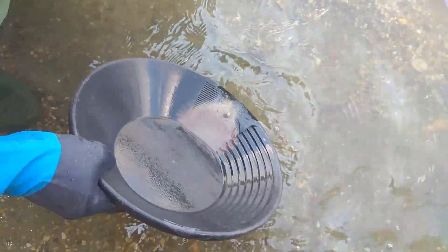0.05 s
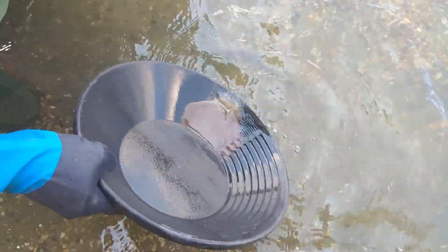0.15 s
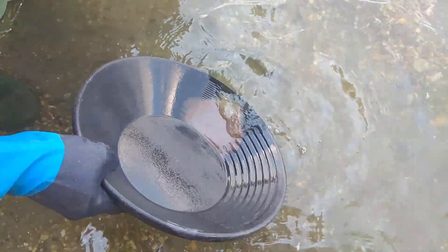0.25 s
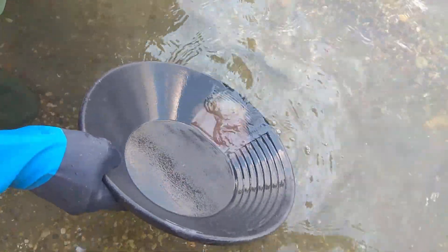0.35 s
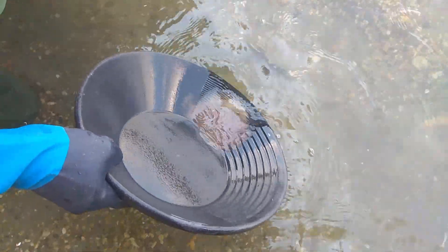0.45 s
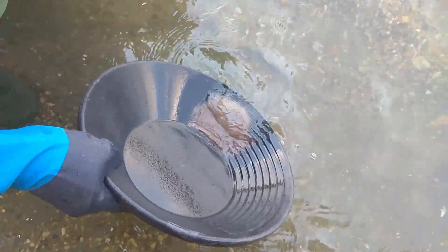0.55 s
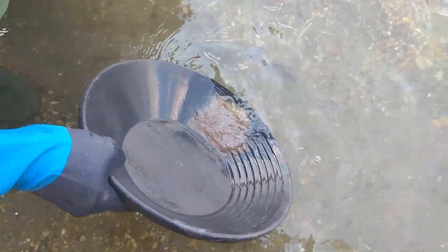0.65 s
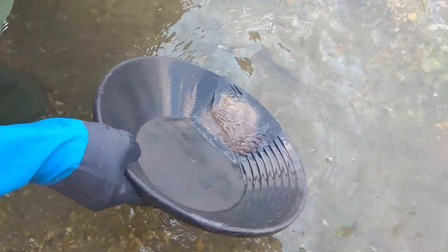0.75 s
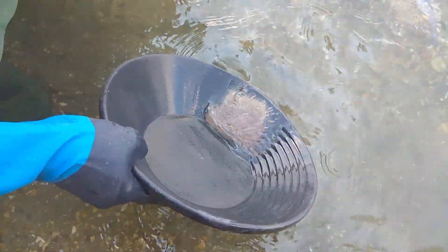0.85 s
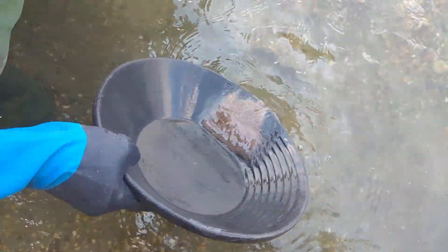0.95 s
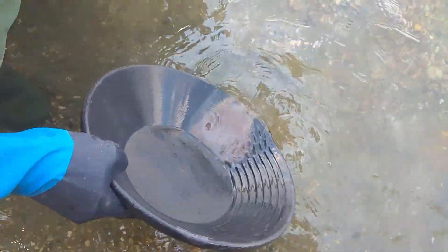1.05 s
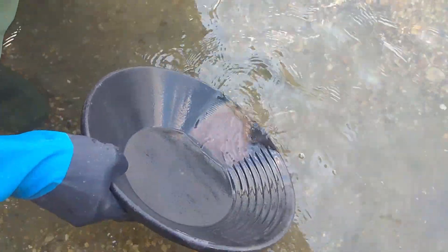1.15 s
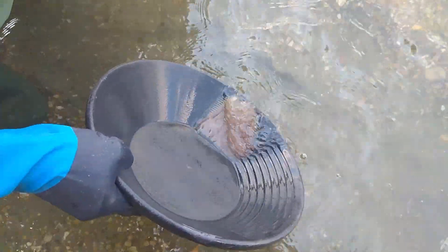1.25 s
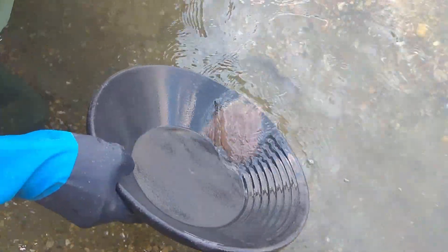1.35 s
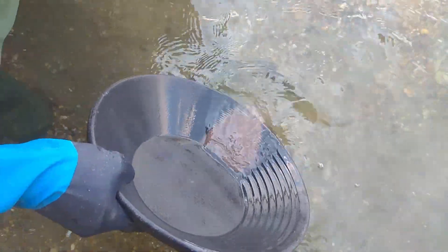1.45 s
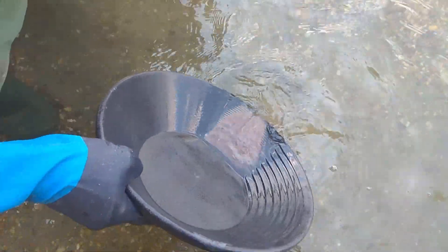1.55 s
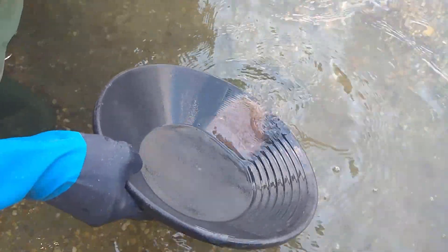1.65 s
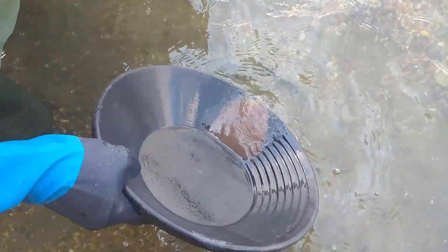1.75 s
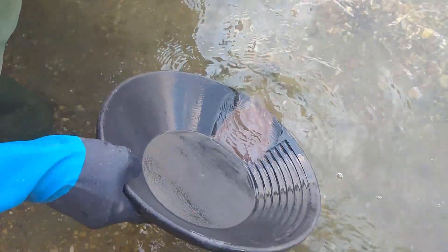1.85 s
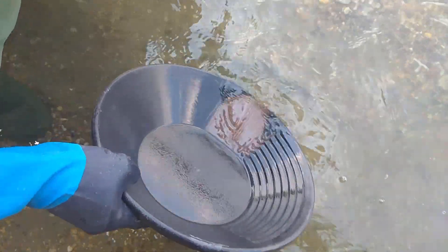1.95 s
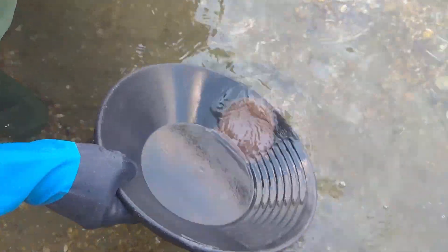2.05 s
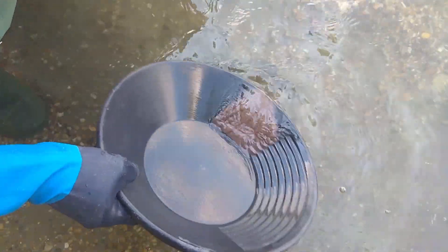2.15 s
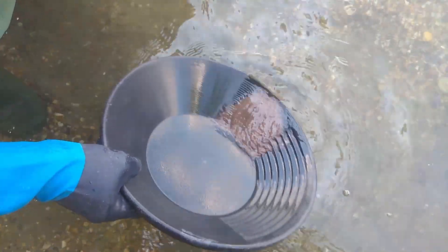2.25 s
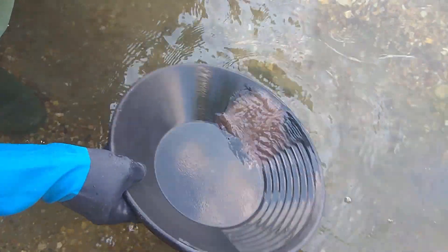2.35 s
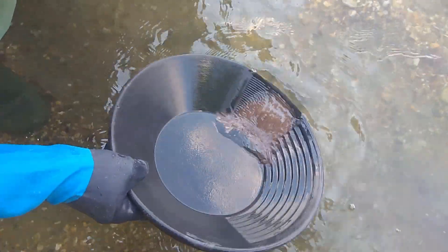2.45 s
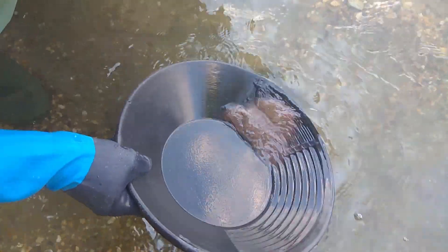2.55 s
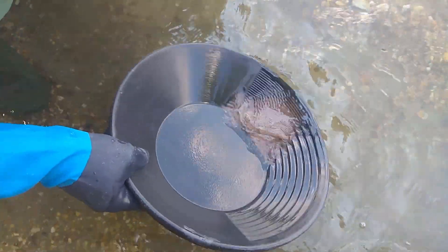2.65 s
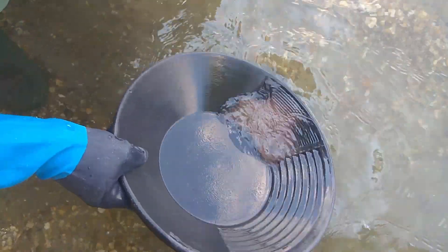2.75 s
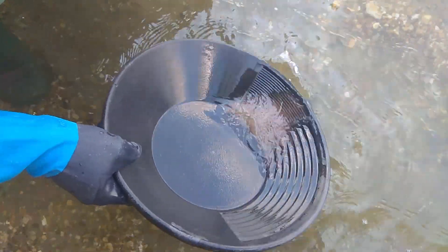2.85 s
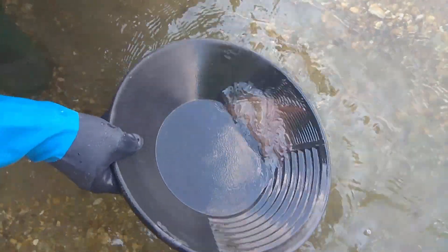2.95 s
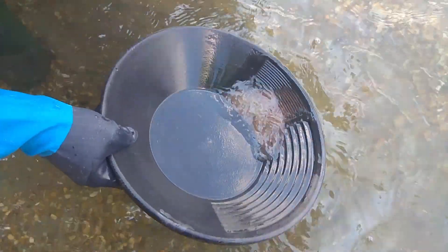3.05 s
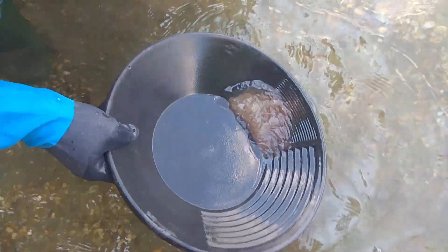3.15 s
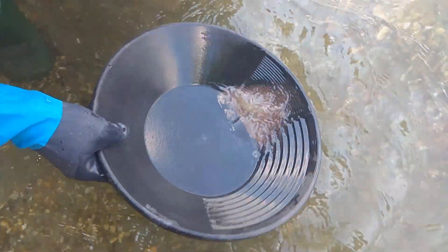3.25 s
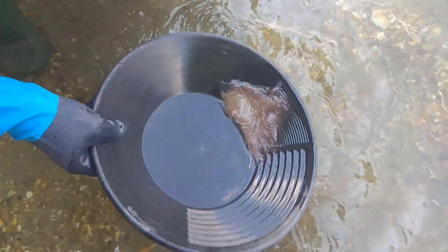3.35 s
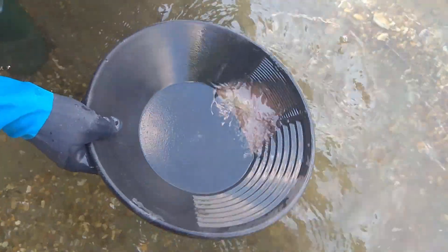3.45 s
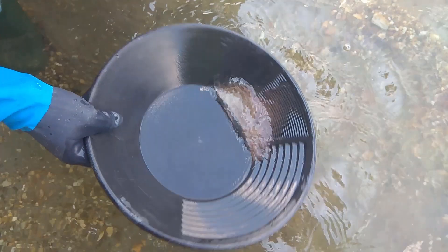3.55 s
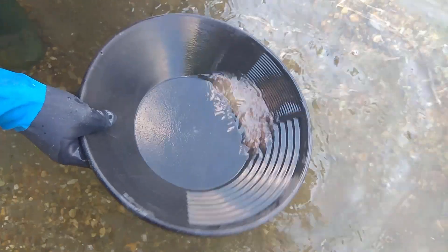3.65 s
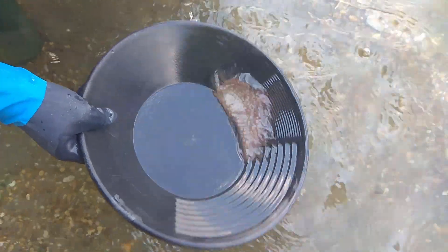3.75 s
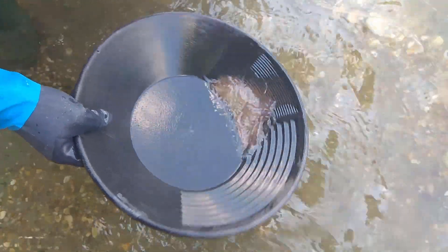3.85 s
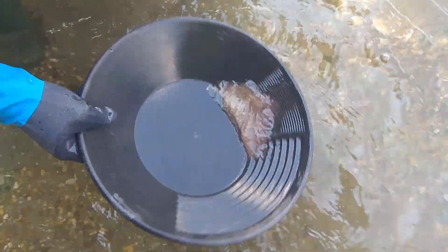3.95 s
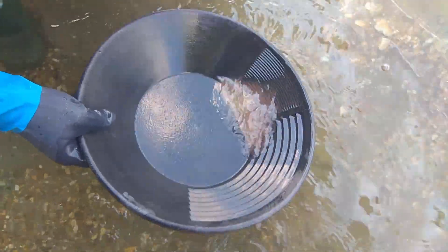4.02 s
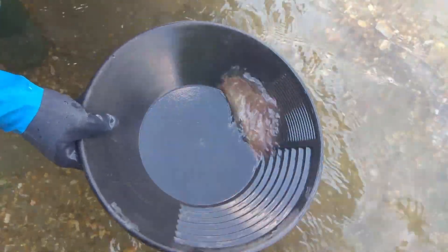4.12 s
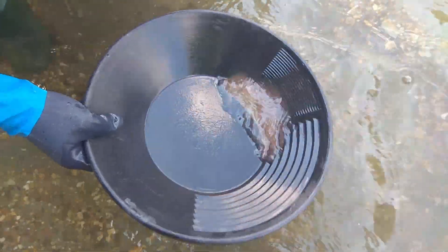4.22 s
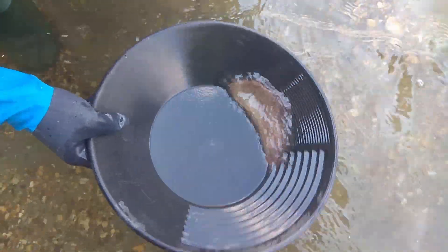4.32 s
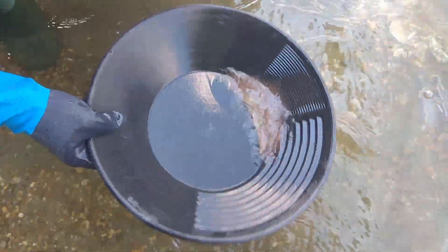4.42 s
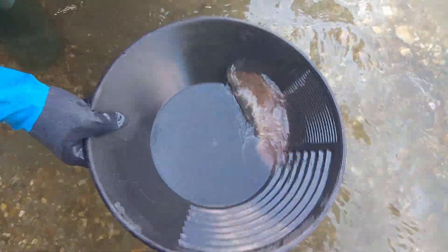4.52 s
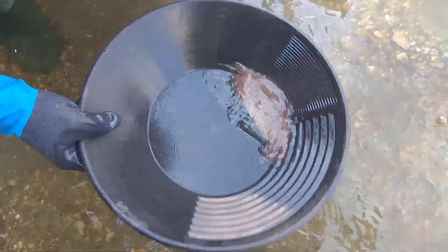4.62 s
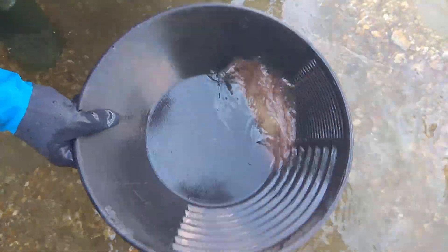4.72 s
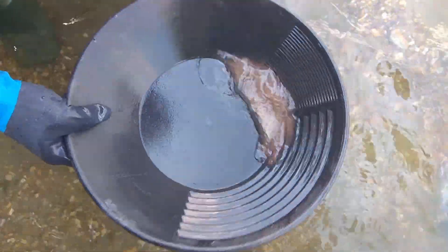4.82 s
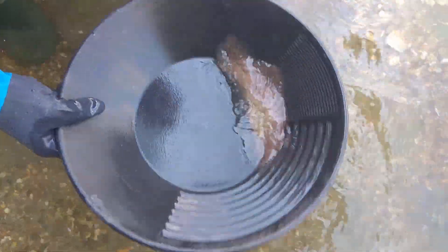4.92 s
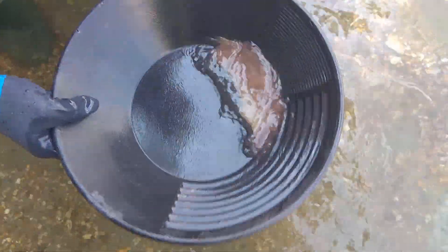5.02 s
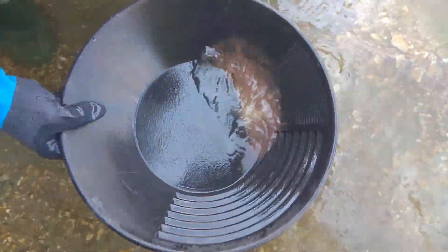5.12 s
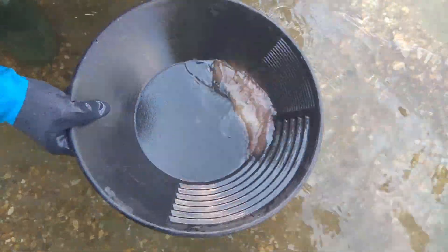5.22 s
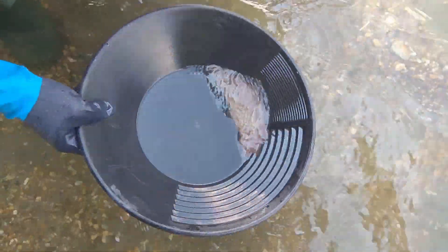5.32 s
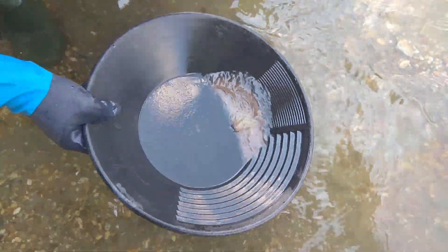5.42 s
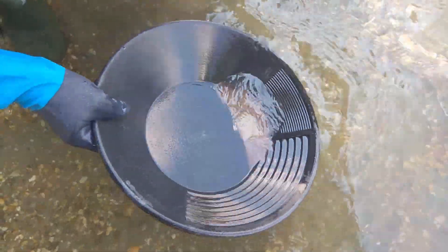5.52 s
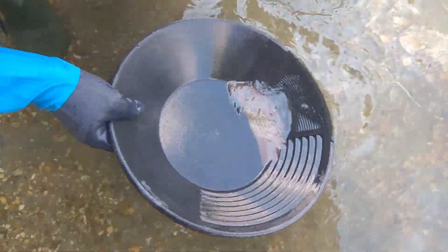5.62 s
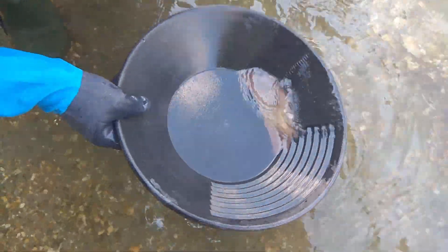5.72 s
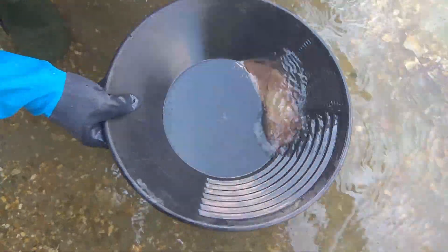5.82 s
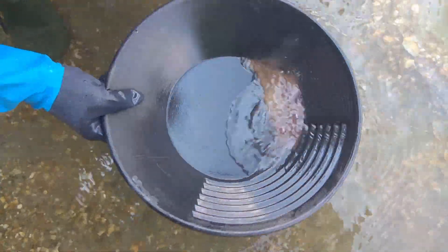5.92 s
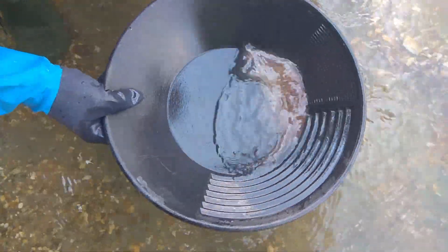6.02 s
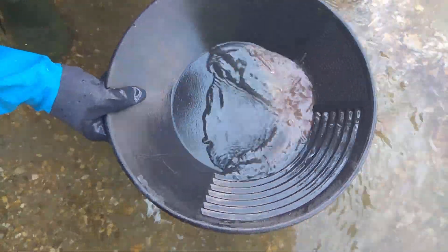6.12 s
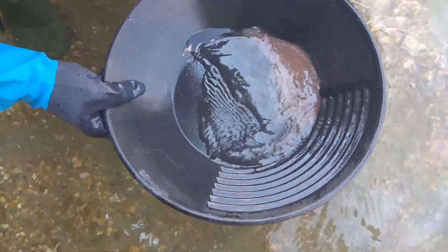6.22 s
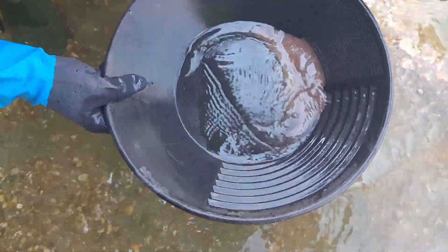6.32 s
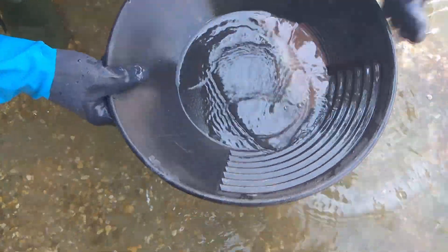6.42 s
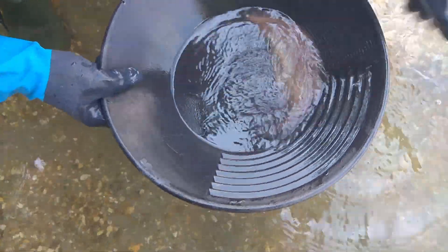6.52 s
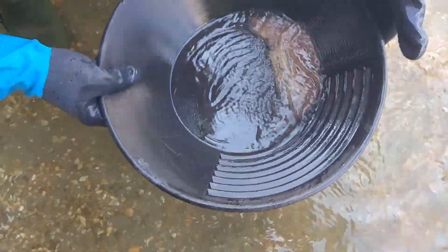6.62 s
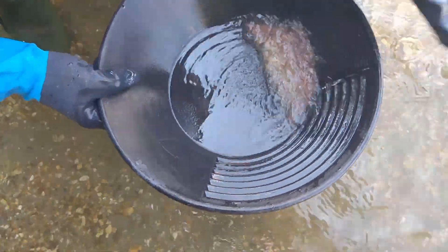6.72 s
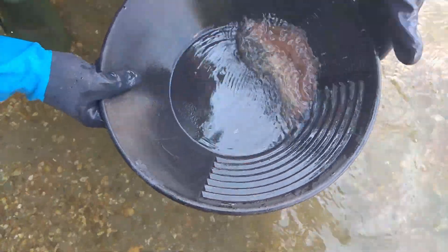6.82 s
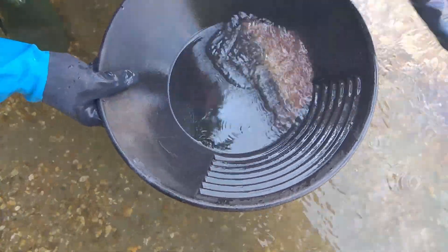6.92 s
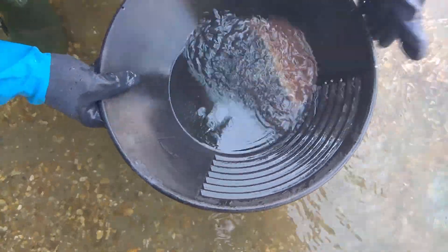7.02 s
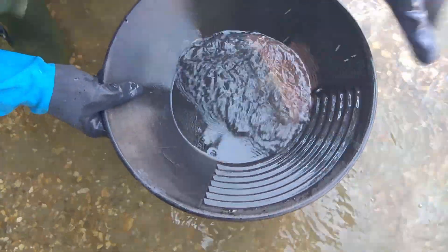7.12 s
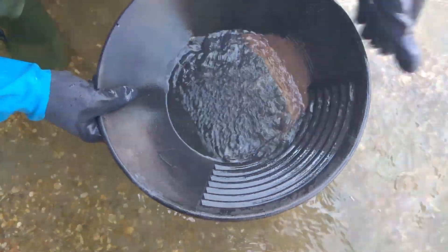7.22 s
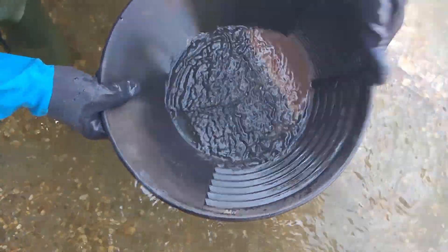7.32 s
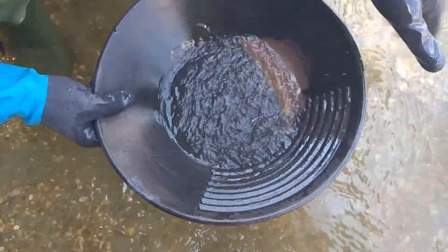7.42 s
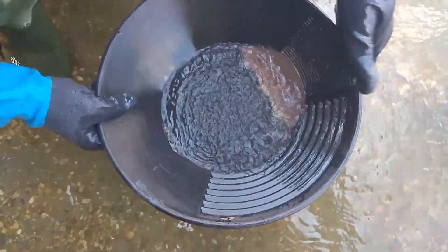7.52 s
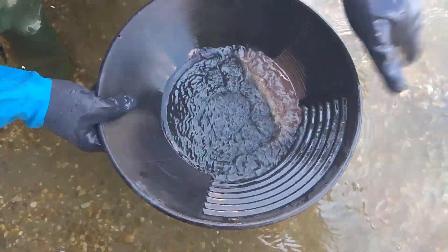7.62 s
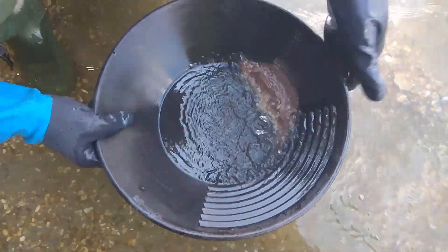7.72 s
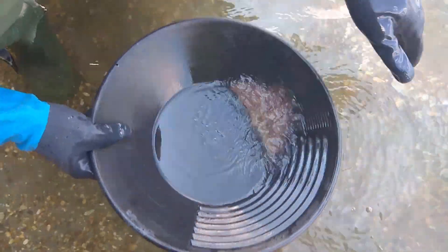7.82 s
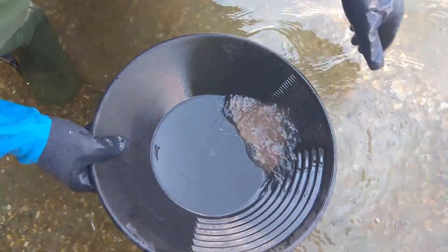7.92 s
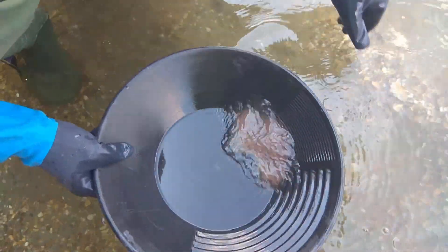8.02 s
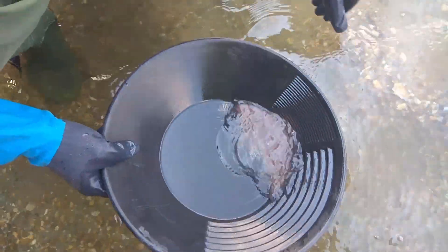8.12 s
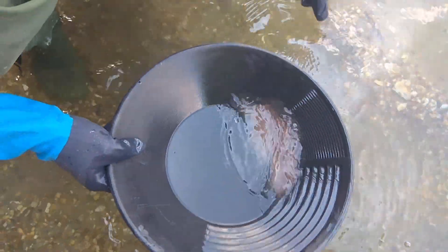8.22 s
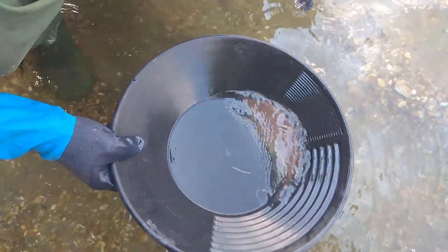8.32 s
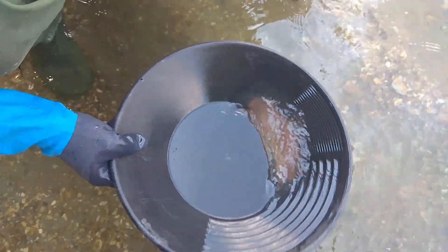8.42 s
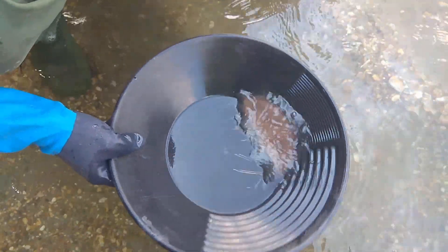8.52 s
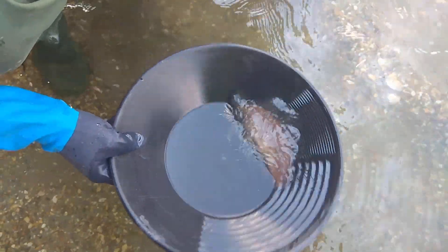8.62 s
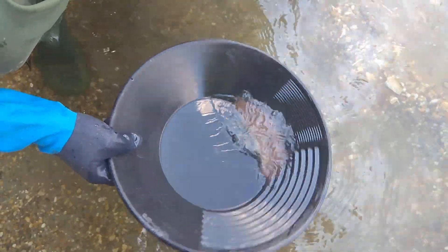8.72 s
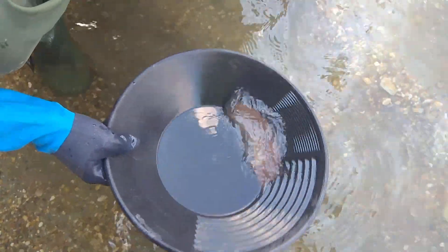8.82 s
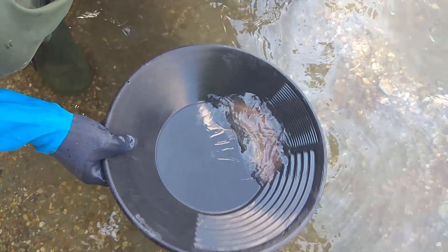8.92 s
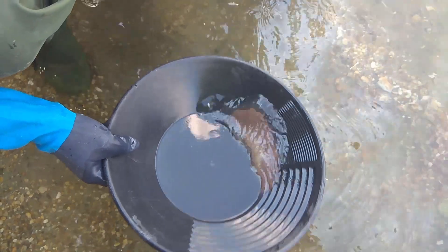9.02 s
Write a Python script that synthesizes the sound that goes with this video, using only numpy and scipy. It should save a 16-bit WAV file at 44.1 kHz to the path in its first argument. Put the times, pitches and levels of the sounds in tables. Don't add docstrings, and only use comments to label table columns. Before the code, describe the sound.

A plastic pan is swirled in a shallow stream, heard close in stereo. Quiet current and thin birds come first, then a crisp splash, swishing water, plopping bubbles and fine crackling spray. The water thins to sparse drips before another short splash. Eight evenly spaced hollow plastic taps grow firmer, with water slapping back inside. A few drips and a faint high bird note close the open-air scene, its quiet parts slightly muffled.

```python
import sys
import numpy as np
from scipy import signal
from scipy.fft import rfft, irfft, next_fast_len
from scipy.io import wavfile
from scipy.ndimage import uniform_filter1d, map_coordinates

SR = 44100
rng = np.random.default_rng(int(sys.argv[2]) if len(sys.argv) > 2 else 0)


def wav_out(sig):
    wavfile.write(sys.argv[1], SR, np.round(np.clip(np.atleast_2d(sig).T, -1, 1) * 32767).astype(np.int16))


def attenuation_scalar(level_db):
    decades = np.asarray(level_db, float) / 20
    return 10 ** decades


N = 399972
LEAD = 40

# (crest [s], level [dB], brightness [dB], rise over 20 dB [s], fall over 20 dB [s])
SURGES = [(.31, -73, 11.5, 0.15, 0.29), (1.07, -48, 5.5, 0.14, 0.54), (1.36, -37, 2.5, 0.1, 0.33),
          (1.8, -48.5, -4, 0.37, 0.63), (2.05, -47, 4, 0.266, 0.74), (2.4, -42, 1.5, 0.26, 0.45),
          (2.74, -52, -3, 0.58, 0.95), (3.0, -52, 3, 0.28, 0.18), (3.3, -65, -8.5, 0.5, 0.75),
          (3.53, -51.5, 5, 0.16, 0.14), (3.85, -49.5, 7.5, 0.089, 0.117), (4.07, -60.5, -4, 0.5, 0.37),
          (4.86, -76, 15.5, 0.073, 0.33), (5.33, -45, 6.5, 0.08, 0.1), (5.5, -46.5, 8, 0.15, 0.11),
          (5.95, -56, 1, 0.052, 0.16), (6.13, -58, 5.5, 0.21, 0.35), (6.38, -65, 5.5, .05, 0.085),
          (7.8, -50.5, 5.5, 0.21, 0.11), (8.27, -74.5, 22, 0.075, 0.114), (8.62, -64.5, 10, 0.049, .1),
          (8.78, -63.5, 6.5, 0.13, 0.11), (8.86, -49, 5.5, 0.23, 0.093), (9.07, -68, 19, 0.31, .2)]
# (delay [s], level [dB], brightness [dB], rise [s], fall [s])
TAP_SURGE = (0.05, -51, 3.5, 0.04, 0.19)
# (gurgle [dB], splash [dB], fizz [dB])
CALM_DB = (-88, -81, -76)
DIES_FASTER = 1.08
SPLASH_DB, SPLASH_LEANS = 3, 1
# (frequency [Hz], level [dB])
GURGLE = [(160, -29), (280, -7.5), (367, -12.5), (686, -7.5), (1120, -12.5), (1770, -18.5), (2000, -14.5),
          (2600, -29), (4400, -120)]
SPLASH = [(1000, -15), (1700, 0), (3500, -0.5), (5500, -3.5), (8000, -31.5)]
FIZZ = [(2650, -39.5), (4500, -6.5), (5830, -11), (7390, 1.5), (10600, 3), (12300, -11.5), (15600, -8.5),
        (16300, -22.5), (16800, -68.5)]
# (frequency [Hz], likeness [0-1])
ALIKE = [(100, 0.72), (500, 0.88), (1500, 0.0072), (15000, 0.088)]

# (time [s], bubble [Hz], plop [dB], crackle
# [dB])
DROPS = [(.276, 3830, -42.5, -27), (.663, 2540, -39.5, -36.5), (1.106, 3800, -51, -22),
         (1.132, 1990, -33.5, -29), (1.188, 3502, -30.5, -49.5), (1.218, 5700, -39, -22),
         (1.245, 3580, -31.5, -27.5), (1.269, 2900, -33.5, -31.5), (1.324, 2315, -17.5, -9),
         (1.726, 2270, -31, -57), (1.817, 1199, -32, -31), (2.011, 3160, -30.5, -26),
         (2.12, 2060, -39, -32), (2.193, 1080, -55, -35), (2.387, 656, -43, -17.5),
         (2.459, 690, -43.5, -48.5), (2.529, 2410, -26.5, -28.5), (2.689, 3740, -34.5, -54),
         (2.724, 2060, -27, -31), (2.873, 2160, -33.5, -39), (2.956, 3740, -35.5, -61),
         (3.06, 740, -71, -32.5), (3.162, 720, -57, -34),
         (3.425, 2360, -46, -31.5), (3.452, 3780, -26.5, -24), (3.485, 6000, -37, -26),
            (3.56, 2020, -42.5, -27), (3.724, 740, -48.5, -31), (3.748, 2010, -36.5, -59),
            (3.797, 2070, -42.5, -28.5), (3.829, 722, -44.5, -26), (3.943, 5200, -36.5, -41),
            (3.98, 1600, -62, -26.5), (4.006, 637, -37.5, -75), (4.099, 1626, -28, -66),
            (4.197, 610, -57, -43), (4.238, 4520, -38.5, -61), (4.391, 961, -59, -40),
            (4.828, 5180, -60, -28.5), (5.281, 1670, -45.5, -41), (5.304, 833, -50, -30),
            (5.442, 3960, -52, -36), (5.462, 2020, -25, -16), (5.821, 1910, -56, -65),
            (5.931, 755, -42.5, -29.5), (5.968, 1350, -40, -27), (6.037, 5870, -50, -16.5),
            (6.116, 4170, -38.5, -51), (6.355, 2410, -37, -34),
         (3.406, 6500, -37.5, -35), (4.414, 3350, -51.5, -62.5), (4.762, 4330, -50, -57),
         (5.211, 3510, -58, -60), (7.948, 6100, -51.5, -65), (6.77, 2390, -36, -55),
         (6.987, 5470, -41, -51), (7.231, 4200, -32.5, -35), (7.406, 5020, -26.5, -28),
         (8.403, 4205, -44, -71), (8.476, 1330, -50.5, -75), (8.508, 1440, -50.5, -42.5),
         (8.561, 1890, -38, -27), (8.581, 3070, -38.5, -33), (8.593, 4240, -36.5, -22.5),
         (8.728, 3500, -42, -56), (8.755, 4060, -40, -33), (8.823, 844, -48, -26),
         (8.854, 3230, -37.5, -24.5), (8.984, 4400, -44, -33)]
# (time [s], left over right [dB])
RIM_PLACE = [(0, 3), (1.2, 7), (1.8, 6), (2.1, 11.5), (2.5, 3.5), (2.9, 4.5), (3.5, 2.5), (4.2, -3),
             (4.9, -5.5), (5.3, 7.5), (6.3, -6.5), (7, 3), (9.07, 4.5)]
SMALL_HZ, SMALL_SLAP_DB, SMALL_LEFT_DB = 3500, -8.5, 6

# (time [s], peak [dB], crack [dB], upper modes [dB], slosh [dB])
TAPS = [
    (6.511, -24.5, -1, 2.5, -0.5),
    (6.689, -20.5, -1, 3.5, -1),
    (6.848, -12, -7, -2.5, -9),
    (7.024, -15, -6, 4, -7.5),
    (7.194, -15, -3, 7.5, -8),
    (7.368, -11, -11.5, -1.5, -7.5),
    (7.538, -10, -8.5, 2.5, -6),
    (7.701, -8.5, -10.5, -2.5, -5),
]
# (frequency [Hz], level [dB], t60 [s])
PAN_MODES = [(226, -4.5, 0.11), (284.5, 0.5, 0.06), (550, -8, 0.054), (899, -15.5, 0.055),
             (1270, -4, 0.015), (1730, -13, 0.02), (2020, -7.5, 0.022)]
# (frequency [Hz], level [dB])
SLOSH_MODES = [(673, -3), (818, -13.5)]
# (frequency [Hz], level [dB])
CRACK = [(410, -31), (700, -11), (1680, -8), (1920, -6.5), (2260, -3.5), (2870, -12.5), (6030, -12),
         (9110, -6.5), (14300, -17.5), (16800, -33.5)]
SPRAY_DB = (-40.5, -41.5, -38.5, -31.5, -40, -35.5, -38, -37)
SLAP_BACK_S = (.024, 0.011, .027, 0.024, 0.017, 0.028, .028, 0.024)
CHURN = (.8, .9, .6, .9, .5, .2, .15, .2)
HOLD_S, RINGS_ON = 0.011, 0.28

# (time [s], peak [dB])
SNAPS = [(1.107, -29.5), (1.325, -9), (1.33, -16), (1.726, -35), (2.012, -20.5), (2.195, -28), (2.389, -19),
         (2.532, -17), (2.725, -22), (2.875, -32.5), (3.452, -28.5), (3.982, -30), (4.097, -43),
         (5.465, -17), (5.46, -14)]
# (time [s], centre
# [Hz], peak [dB])
TICKS = [(1.153, 1990, -32), (1.23, 5540, -26), (1.258, 9500, -25), (1.292, 3440, -38), (1.34, 3100, -28),
         (1.385, 8400, -25), (1.397, 9500, -33), (1.411, 8900, -22), (1.417, 8500, -27), (1.436, 3700, -34),
         (1.472, 5000, -35), (1.551, 6000, -36), (1.757, 6000, -44), (1.807, 8260, -28), (1.874, 1220, -46),
         (1.963, 8900, -33.5), (1.975, 1140, -38), (2.024, 8600, -21), (2.03, 3380, -27.5),
         (2.043, 1030, -38.5), (2.079, 8750, -32.5), (2.086, 8000, -41), (2.13, 10400, -29),
         (2.166, 6020, -29.5), (2.203, 1090, -33.5), (2.241, 1090, -41), (2.253, 10500, -29),
         (2.265, 7700, -32), (2.341, 2370, -34), (2.357, 2010, -32), (2.364, 9400, -24), (2.374, 7000, -19),
         (2.414, 8500, -24), (2.437, 9000, -25), (2.553, 8800, -26), (2.641, 6230, -43), (2.907, 1700, -35),
         (3.02, 7460, -32), (3.222, 5000, -46.5), (3.255, 7800, -34.5), (3.363, 6150, -49),
         (3.512, 7040, -31),
         (3.73, 8700, -27), (3.775, 9500, -35), (3.836, 6200, -25), (3.907, 1330, -40),
              (3.918, 2020, -41), (3.957, 7400, -37), (4.05, 9000, -34.5), (4.173, 7600, -38),
              (4.43, 805, -66), (4.64, 740, -63.5), (4.66, 2140, -59), (4.825, 1420, -57.5),
              (4.879, 1410, -58), (4.949, 820, -52), (4.95, 4040, -60), (5.024, 1220, -57),
              (5.149, 1380, -66), (5.168, 8900, -46), (5.252, 8950, -38), (5.329, 1940, -33),
              (5.344, 1060, -48), (5.402, 4680, -38), (5.499, 4560, -29), (5.555, 6050, -36),
              (5.651, 8650, -41.5), (5.914, 8390, -34.5), (6.035, 2750, -35.5), (6.05, 2300, -36),
              (6.073, 8150, -35), (6.147, 2020, -43.5), (6.17, 8950, -31), (6.194, 9000, -36),
              (6.223, 4630, -44.5), (6.248, 2540, -46), (6.278, 7300, -49), (6.824, 5870, -40),
              (7.073, 8250, -26), (7.251, 655, -37), (7.335, 4700, -45), (7.57, 6780, -27),
              (8.115, 2110, -57.5), (8.367, 826, -52), (8.389, 3670, -46), (8.436, 4500, -49),
              (8.465, 6000, -57.5), (8.717, 5980, -43), (8.773, 2580, -40), (9.041, 5700, -37),
         (.092, 1400, -53), (0.32, 8000, -46), (2.5, 6200, -27), (2.39, 1500, -49), (3.1, 5500, -36),
               (5.278, 11500, -33), (5.476, 9500, -27), (5.688, 6500, -52), (4.1, 3000, -40)]
TICK_CYCLES, TICK_S = 5.2, 0.0016
TICK_WIDENS = 0.28
# (time [s], frequency [Hz], level [dB], life [s])
THUMP = (2.385, 260, -32, .0035)
# (start [s], length [s], first [Hz], last [Hz], width [Hz], level [dB])
RUNNEL = (3, .3, 3247.5, 2451, 380, -43.5)

# (frequency [Hz], level [dB])
RUMBLE = [(15, -56.5), (25, -18), (65, -22.5), (106, -2.5), (156, 4), (209, 3.5), (302, -17.5),
          (391, -36.5), (420, -36.5), (550, -51.5), (920, -120)]
# (time [s], level [dB])
CURRENT_LEVEL = [(0, -49.5), (1.35, -48), (2, -52), (2.4, -64.5), (2.85, -48), (3.4, -54), (4.4, -48),
                 (4.9, -48.5), (5.5, -43), (6.35, -55), (6.62, -45), (7.15, -46), (7.66, -52), (7.8, -49),
                 (8.0, -72), (8.25, -62.5), (8.93, -81.5), (9.07, -54.5)]
# (frequency [Hz], level [dB])
RIFFLE = [(1000, -85), (1700, -35.5), (2060, -35), (2260, -10.5), (3670, 0), (5010, -11.5), (5460, -34.5),
          (5850, -14.5), (6500, -50), (13200, -120)]
# (time [s], level [dB])
RIFFLE_LEVEL = [(0, -49), (1.0, -52.5), (1.3, -48), (2.9, -63), (3.15, -102), (9.1, -68)]
# (time [s], level [dB])
TRICKLE_LEVEL = [(4.2, -85.5), (4.45, -63), (4.82, -85), (4.97, -73), (5.6, -76.5), (5.85, -90.5),
                 (6.15, -55.5), (6.35, -82.5), (7.85, -86), (7.92, -72.5), (8.2, -100.5)]
# (start [s], length [s], frequency [Hz], level [dB])
FAR_CALLS = [(4.295, 0.32, 1560, -75), (4.644, 0.06, 3900, -76), (4.68, .05, 2044, -71),
             (4.843, 0.069, 2660, -80), (5.032, 0.14, 2325, -68), (5.149, 0.25, 1390, -64),
             (5.824, 0.07, 1940, -76), (7.866, 0.24, 1360, -66.5), (7.95, 0.27, 3790, -76.5),
             (8.172, 0.16, 3530, -67), (5.929, 0.059, 1690, -47.5), (5.94, 0.049, 794, -49.5),
             (5.97, 0.044, 1330, -45), (8.353, 0.15, 3305, -68), (8.356, 0.071, 1295, -67),
             (8.411, 0.073, 1490, -62)]
# (start [s], length [s], first [Hz], last [Hz], level [dB])
BIRDS = [
    (0, .27, 2220, 2180, -55),
    (.05, .08, 3900, 3250, -51),
    (.28, .07, 3950, 3100, -49),
    (3.15, .27, 3720, 4000, -68),
    (4.41, .17, 1950, 2300, -67),
    (4.98, .15, 2700, 2250, -74),
    (6.62, .07, 7900, 7800, -57),
    (6.76, .08, 7600, 7500, -57),
    (8.03, .34, 7880, 7480, -56),
]
# (frequency [Hz], t60 [s])
BANK_ECHO = [(300, 0.072), (3000, 0.077), (12000, 0.043)]


def unit(x):
    return x / np.sqrt(np.mean(x ** 2) + 1e-20)


def along(points, hz):
    f, v = np.transpose(points)
    return np.interp(np.log(hz + 1), np.log(f + 1), v)


def curves(rows):
    s, *columns = np.transpose(rows)
    return [np.interp(np.arange(N) / SR, s, column) for column in columns]


def wobble(rate):
    knots = rng.standard_normal(int(N * rate / SR) + 4)
    return map_coordinates(knots, [np.arange(N) * rate / SR])


def filtered(x, response):
    m = next_fast_len(x.shape[-1] + 512)
    spectrum = rfft(x, m) * response(np.fft.rfftfreq(m, 1 / SR))
    return irfft(spectrum, m)[..., :x.shape[-1]]


def blank():
    return np.zeros((2, N + SR))


def trim(mix):
    return mix[:, LEAD:N + LEAD]


def add(mix, s, sound, left_db, lag):
    pair = sound * attenuation_scalar([[left_db / 2], [-left_db / 2]])
    at = round(s * SR) + LEAD
    mix[0, at + round(lag):][:pair.shape[1]] += pair[0]
    mix[1, at:][:pair.shape[1]] += pair[1]


def rim_db(s):
    return np.interp(s, *np.transpose(RIM_PLACE))


def rush(spectrum, alike, patchy_db):
    z = signal.stft(rng.standard_normal((2, N)), nperseg=512)[2]
    field = uniform_filter1d(rng.standard_normal(z.shape[1:]), 6, 0)
    field = unit(uniform_filter1d(field, 8, 1))
    pair = signal.istft(z * attenuation_scalar(patchy_db * field), nperseg=512)[1][:, :N]

    def mid_side(hz):
        turn = np.arccos(np.clip(along(alike, hz), -1, 1)) / 2
        return attenuation_scalar(along(spectrum, hz)) * [np.cos(turn), np.sin(turn)]

    mid, side = filtered(pair, mid_side)
    return unit(np.array([mid + side, mid - side]))


def bubbles(count, hz, spread, cycles, scatter_db, size):
    u, g = rng.random((count, 4)), rng.standard_normal((count, 1))
    t = np.arange(size) / SR
    f = np.clip(hz * np.exp(spread * g), 200, SR / 3)
    age = t * f / cycles
    strength = attenuation_scalar(-scatter_db * np.log(u[:, 1:2] + 1 / 30))
    wave = np.sin(2 * np.pi * f * t * (1 + .12 * age)) * age * np.exp(-3 * age) * strength
    at = (u[:, :1] * N).astype(int) + np.arange(size)
    lag = (u[:, 2:3] * 30).astype(int)
    ports = []
    for delay, weight in ((lag, 1), (15, 0.35 + 1.3 * u[:, 3:])):
        ports.append(np.bincount((at + delay).ravel(), (wave * weight).ravel(), N + SR)[:N])
    return unit(np.array(ports))


def surges():
    delay, *shape = TAP_SURGE
    t = np.arange(0, N, 64) / SR
    shaken = [(tap[0] + delay, *shape) for tap in TAPS]
    s, db, bright, rise, fall = np.transpose([*SURGES, *shaken])[..., None]
    fade_db = -20 * np.maximum((s - t) / np.abs(rise), (t - s) / np.abs(fall)) ** DIES_FASTER
    splash_db = db + SPLASH_DB + SPLASH_LEANS * bright - np.abs(bright)
    levels = []
    for crest, calm in zip((db - bright, splash_db, db + bright), CALM_DB):
        gain = np.sqrt(attenuation_scalar(calm) ** 2 + np.sum(attenuation_scalar(crest + fade_db) ** 2, axis=0))
        levels.append(np.interp(np.arange(N) / SR, t, gain))
    return levels


def wash():
    low, middle, high = surges()
    patter = wobble(60)
    stirred = [np.sqrt(np.abs(1 - (attenuation_scalar(calm) / g) ** 2)) for calm, g in zip(CALM_DB, (low, middle, high))]
    plops = .45 * bubbles(count=1400, hz=1000, spread=.4, cycles=8, scatter_db=3, size=600)
    pings = .75 * bubbles(count=1300, hz=2900, spread=.4, cycles=4.5, scatter_db=3.5, size=240)
    specks = .75 * bubbles(count=2200, hz=8500, spread=.25, cycles=2.2, scatter_db=3.5, size=60)
    gurgle = low * attenuation_scalar(patter) * (rush(GURGLE, ALIKE, patchy_db=4) + stirred[0] * plops)
    splash_gain = middle * attenuation_scalar(-5.0 + 2.0 * patter + [[1.6], [-1.6]])
    splash = splash_gain * (rush(SPLASH, ALIKE, patchy_db=5.0) + stirred[1] * pings)
    fizz_gain = high * attenuation_scalar(-6.5 + 2 * patter + [[1.8], [-1.8]])
    fizz = fizz_gain * (rush(FIZZ, ALIKE, patchy_db=4.5) + stirred[2] * specks)
    return gurgle + splash + fizz


def bubble_ring(t, hz, plop_db, pitch_draw):
    ring = np.clip(7.5 / hz, .002, .011)
    phase = 2 * np.pi * hz * t * (.95 + .06 * t / ring)
    brood = np.sin(1.85 * phase) + np.sin((2.4 + 1.1 * pitch_draw) * phase)
    brood = 0.97 * (hz < 1200) * brood * np.exp(-t / ring)
    envelope = (1 - np.exp(-t / 0.00043)) * np.exp(-(t / ring) ** 2.5)
    return attenuation_scalar(plop_db + 5.5) * (np.sin(phase) + brood) * envelope


def drops():
    mix, t = blank(), np.arange(SR // 16) / SR
    for s, hz, plop_db, crackle_db in DROPS:
        small, db = hz > SMALL_HZ, max(plop_db, crackle_db) + 8
        u, noise = rng.random(3), rng.standard_normal((3, 2, len(t)))
        life = np.clip(0.0088 + 0.00019 * (db + 42), .002, .02) * (0.47 + .3 * u[0]) / (1 + small)
        rise = 1 - np.exp(-(t / .002) ** 2)
        shape = rise * (np.exp(-(t / life) ** 2.0) + 0.13 * np.exp(-t / 0.027))
        grit = np.exp(0.62 * unit(uniform_filter1d(noise[2, 0], size=24)))
        tint = np.transpose([np.geomspace(3000, 16000, num=9), rng.normal(0, 7.6, size=9)])
        crackle = (noise[0] + noise[0, 0]) * grit
        crackle = unit(filtered(crackle, lambda f: attenuation_scalar(along(FIZZ, f) + along(tint, f))))
        low_hz, high_hz = .5 * min(hz, 1500), 2 * min(hz, 2500) + 1200
        slap = (noise[1] + 3.4 * noise[1, 0]) * grit
        slap = unit(filtered(slap, lambda f: 1 / np.sqrt(
            (1 + (low_hz / (f + 1)) ** 6) * (1 + (f / high_hz) ** 6))))
        burst = attenuation_scalar(crackle_db - 8.0) * crackle + attenuation_scalar(plop_db - 4.5 + SMALL_SLAP_DB * small) * slap
        drop = shape * burst + bubble_ring(t, hz, plop_db, u[2])
        add(mix, s - .0015, drop, rim_db(s) + SMALL_LEFT_DB * small, 20 * u[1] - 10)
    return trim(mix)


def pan_ring(t, upper_db, wander):
    total = 0
    for hz, level_db, t60 in PAN_MODES:
        rattle = unit(uniform_filter1d(np.roll(wander, int(hz)), size=90))
        decay_db = level_db + (upper_db + 5.5) * (hz > 400) + 2 * rng.normal() - 60 * t / t60
        phase = 2 * np.pi * hz * rng.normal(1, 0.07) * t + 0.5 * (hz > 700) * rattle
        total = total + attenuation_scalar(decay_db) * np.sin(phase)
    soft = (1 - np.exp(-(t / 0.0033) ** 2)) * (RINGS_ON + np.exp(-(t / HOLD_S) ** 4))
    return -attenuation_scalar(0.5) * soft * total


def slap_back(t, back_s, churn, noise):
    centre_s = .002 + rng.normal(back_s, .0003)
    swell = np.exp(-((t - centre_s) / (.0095 + .006 * churn)) ** 4)
    swell = swell * (1 + .4 * unit(uniform_filter1d(noise[0], size=200)))
    clear = 0
    for hz, level_db in SLOSH_MODES:
        clear = clear + attenuation_scalar(level_db) * np.sin(2 * np.pi * (hz * rng.normal(1, 0.035) * t + rng.random()))
    broken = filtered(noise[1], lambda f: np.exp(-.5 * (np.log((f + 1) / 720) / 0.21) ** 2))
    return ((1 - churn) * clear + churn * 0.25 * unit(broken)) * swell


def taps():
    mix, t = blank(), np.arange(SR // 5) / SR
    for tap, spray_db, back_s, churn in zip(TAPS, SPRAY_DB, SLAP_BACK_S, CHURN):
        s, db, crack_db, upper_db, slosh_db = tap
        noise = rng.standard_normal((2, 2, len(t)))
        ring = pan_ring(t, upper_db, noise[1, 1])
        slosh = slap_back(t, back_s, churn, noise[1])
        crack = unit(filtered(noise[0] + 0.5 * noise[0, 0], lambda f: attenuation_scalar(along(CRACK, f))))
        crack = crack * np.exp(-(t / 0.0072) ** 2.3) * (1 - np.exp(-t / 0.0011))
        thrown = np.exp(-.5 * ((t - .028) / np.where(t < .028, .008, .015)) ** 2)
        spray = unit(filtered(noise[1], lambda f: attenuation_scalar(along(CRACK, f)))) * thrown
        add(mix, s - .001, attenuation_scalar(db) * (ring + attenuation_scalar(slosh_db) * slosh), -.4, 4)
        add(mix, s - .001, attenuation_scalar(db + crack_db + 3.0) * crack + attenuation_scalar(spray_db) * spray, 2.5, 15)
    return trim(mix)


def snaps():
    mix, t = blank(), np.arange(SR // 100) / SR
    for s, db in SNAPS:
        age = t / .0005
        puff = rng.standard_normal(len(t)) * age * np.exp(-age)
        click = filtered(puff, lambda f: attenuation_scalar(along(CRACK, f)))
        add(mix, s - .0005, attenuation_scalar(db) * click / np.abs(click).max(), rim_db(s), 16 * rng.random() - 8)
    return trim(mix)


def ticks():
    mix, t = blank(), np.arange(SR // 25) / SR
    for s, hz, db in TICKS:
        noise, lag = rng.standard_normal((2, len(t))), 20 * rng.random() - 10
        width = 0.066 + TICK_WIDENS * hz / 10000
        age = t / (TICK_S + TICK_CYCLES / hz)
        puff = filtered(noise + noise[0], lambda f: np.exp(-.5 * (np.log((f + 1) / hz) / width) ** 2))
        puff = puff * age * np.exp(-age ** 2)
        add(mix, s - .001, attenuation_scalar(db) * puff / np.abs(puff).max(), rim_db(s), lag)
    return trim(mix)


def dip():
    mix, t = blank(), np.arange(SR // 20) / SR
    s, hz, db, life = THUMP
    push = np.sin(2 * np.pi * hz * t) * t / life * np.exp(1 - t / life)
    add(mix, s, attenuation_scalar(db) * push, 0, 0)
    s, length, first_hz, last_hz, width_hz, db = RUNNEL
    u = np.linspace(0, 1, round(length * SR))
    flutter = filtered(rng.standard_normal((2, SR // 2)), lambda f: np.exp(-(f / width_hz) ** 2))
    flutter = unit(flutter)[:, :len(u)]
    carrier = np.sin(2 * np.pi * np.cumsum(first_hz + (last_hz - first_hz) * u) / SR)
    add(mix, s, attenuation_scalar(db) * flutter * np.sin(np.pi * u) ** .5 * carrier, 2, 0)
    return trim(mix)


def river():
    current_db = curves(CURRENT_LEVEL)[0]
    rumble = rush(RUMBLE, [(45, 0.77), (130, 0.98)], patchy_db=2)
    rumble = attenuation_scalar(current_db + 1.1 * wobble(12)) * rumble
    upper = filtered(rumble, lambda hz: 1 / (1 + (230 / (hz + 1)) ** 6))
    rumble = rumble + (attenuation_scalar(0.27 * (current_db + 50)) - 1) * upper
    riffle_db = curves(RIFFLE_LEVEL)[0] + wobble(30) + [[2.5], [-2.5]]
    riffle = attenuation_scalar(riffle_db) * rush(RIFFLE, ALIKE, patchy_db=3.0)

    def hollow(hz):
        return 1 / (1 + ((hz - 1370) / 140) ** 2) + 0.23 / (1 + ((hz - 850) / 150) ** 2)

    murmur = unit(filtered(rng.standard_normal((2, N)), hollow))
    murmur = attenuation_scalar(curves(TRICKLE_LEVEL)[0] + 2.8 * wobble(6.4)) * murmur
    return rumble + riffle + murmur


def far_calls():
    mix = blank()
    for s, length, hz, db in FAR_CALLS:
        noise = rng.standard_normal((2, SR // 2))
        note = unit(filtered(noise, lambda f: 1 / (1 + ((f - hz) / 45) ** 2)))[:, :round(length * SR)]
        swell = np.sin(np.pi * np.linspace(0, 1, note.shape[1]) ** 0.4)
        add(mix, s, attenuation_scalar(db) * note * swell, 0, 0)
    return trim(mix)


def birds():
    mix = blank()
    for s, length, first_hz, last_hz, db in BIRDS:
        u = np.linspace(0, 1, round(length * SR))
        hz = first_hz + (last_hz - first_hz) * u ** 1.3
        swell = np.sin(np.pi * u ** .45) ** .8
        rough = unit(uniform_filter1d(rng.standard_normal(N // 10), size=200))[:len(u)]
        whistle = np.sin(2 * np.pi * np.cumsum(hz) / SR)
        add(mix, s, attenuation_scalar(db) * (1 + 0.51 * rough) * swell * whistle, 1.5, 0)
    return trim(mix)


def banks(x):
    hz, t, z = signal.stft(rng.standard_normal((2, SR // 3)), SR, nperseg=256)
    tail = signal.istft(z * attenuation_scalar(-60 * t / along(BANK_ECHO, hz)[:, None]), SR, nperseg=256)[1]
    delayed = np.pad(x, ((0, 0), (200, 0)))
    return signal.fftconvolve(delayed, tail / np.linalg.norm(tail[0]), axes=1)[:, :N]


def scene():
    close = np.array([drops(), taps()])
    wet, knocks = filtered(close, lambda hz: 1 / np.sqrt(1 + (110 / (hz + 1)) ** 4))
    echo = attenuation_scalar(-13.0) * banks(wet + .45 * knocks)
    pan = wet + knocks + wash() + snaps() + ticks() + dip()
    return pan + echo + river() + far_calls() + birds()


def darken_bands(x, margin_db, depth_db, quiet_db):
    z = signal.stft(x, nperseg=1024)[2]
    power = np.mean(np.abs(z[:, :504]) ** 2, axis=0)
    bands = power.reshape(-1, 4, z.shape[2]).mean(axis=1)
    now_db = 10 * np.log10(bands + 1e-20)
    level_db = uniform_filter1d(now_db, size=7, axis=1)
    around_db = uniform_filter1d(level_db, size=11, axis=0)
    threshold_db = margin_db + rng.normal(0, 1.5, size=(len(bands), 1))
    sunk = level_db - around_db < threshold_db
    treble = (np.arange(len(bands)) > 7)[:, None]
    shut = sunk * (now_db < quiet_db) * treble
    z[:, :504] *= attenuation_scalar(depth_db * np.repeat(shut, 4, axis=0))
    return signal.istft(z, nperseg=1024)[1][:, :N]


def roll_off(x):
    return signal.sosfilt(signal.butter(12, 16970, fs=SR, output="sos"), x)


def record(dry):
    wet = darken_bands(dry, margin_db=-1.5, depth_db=-24, quiet_db=-74)
    mix = filtered(np.clip(wet, -.8, .8), lambda hz: hz < 16900)
    return roll_off(mix)


dry = scene()
out = record(dry)
wav_out(out)
```